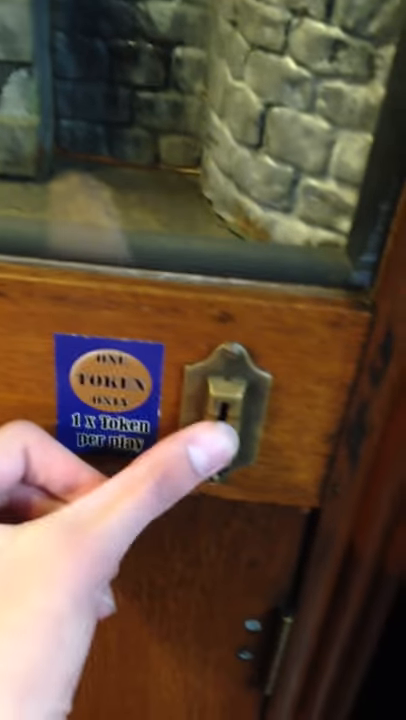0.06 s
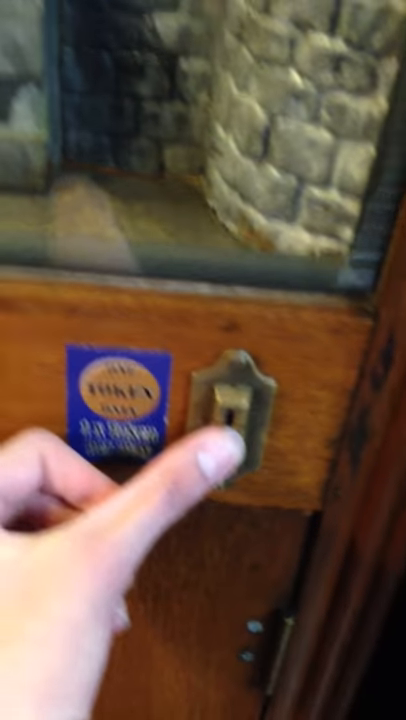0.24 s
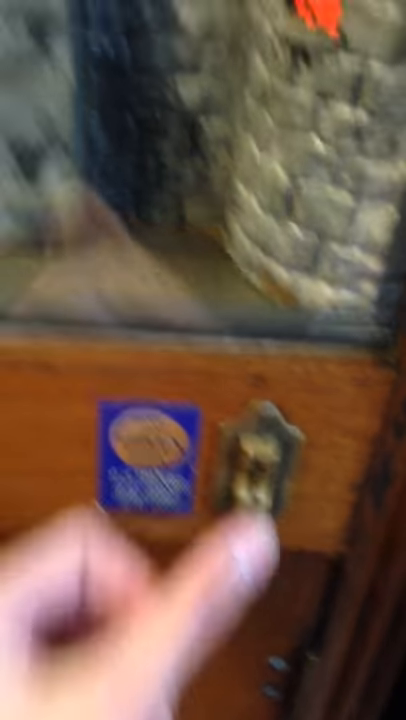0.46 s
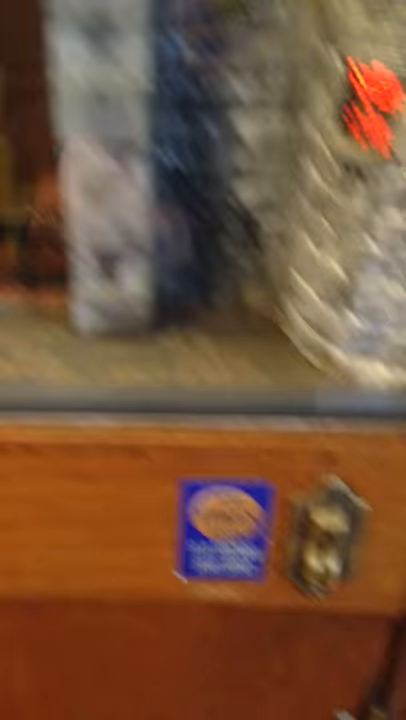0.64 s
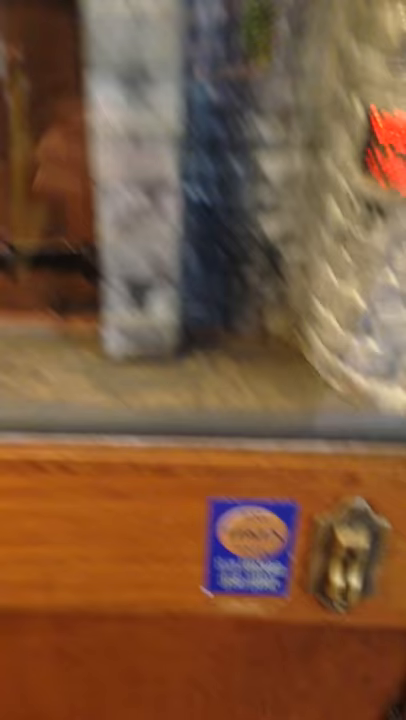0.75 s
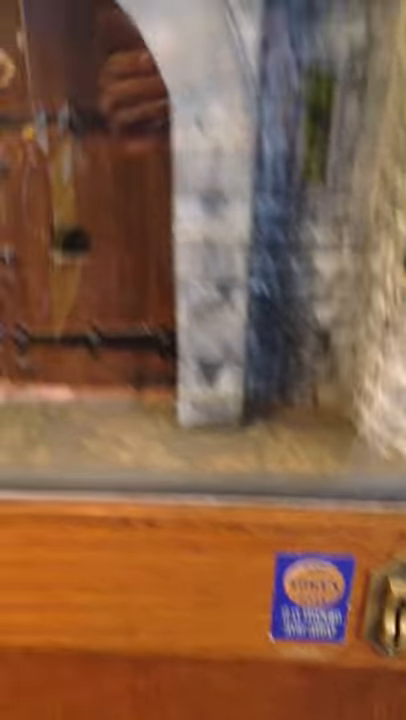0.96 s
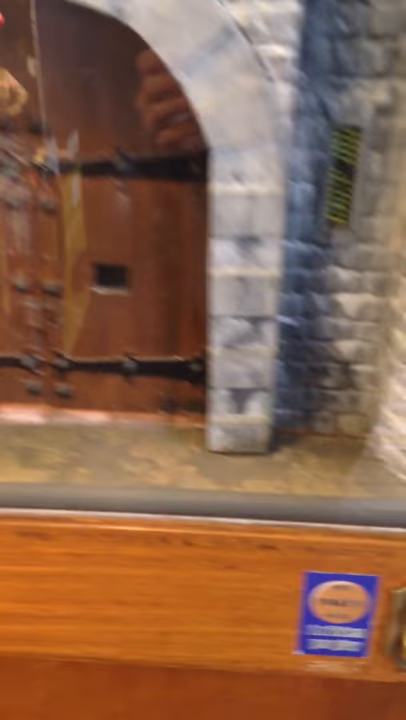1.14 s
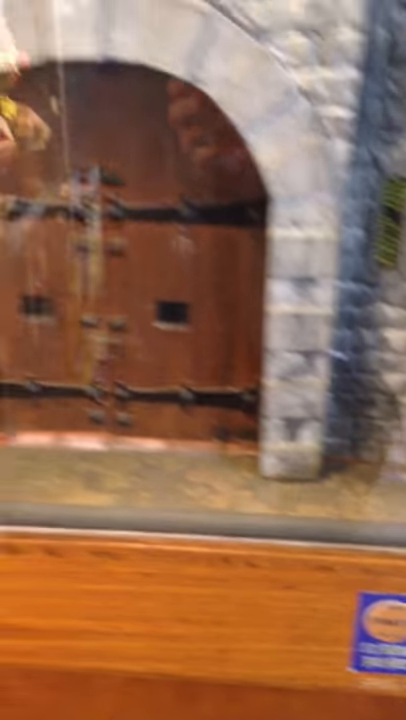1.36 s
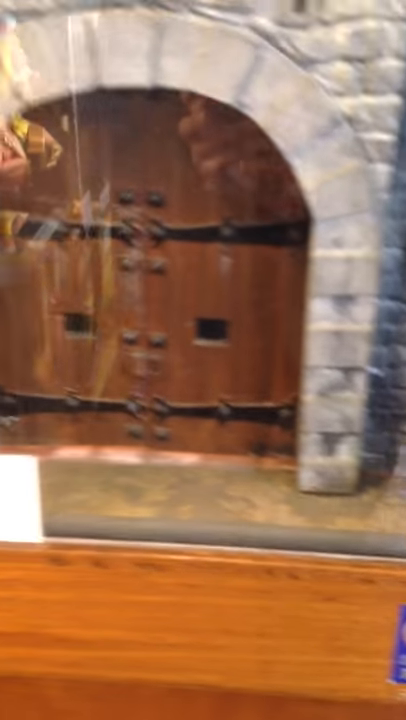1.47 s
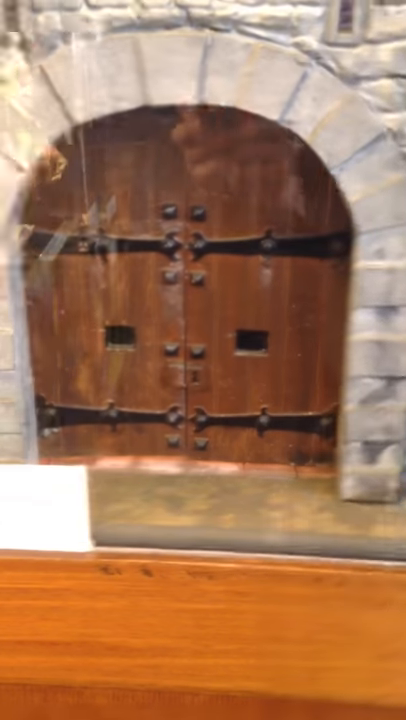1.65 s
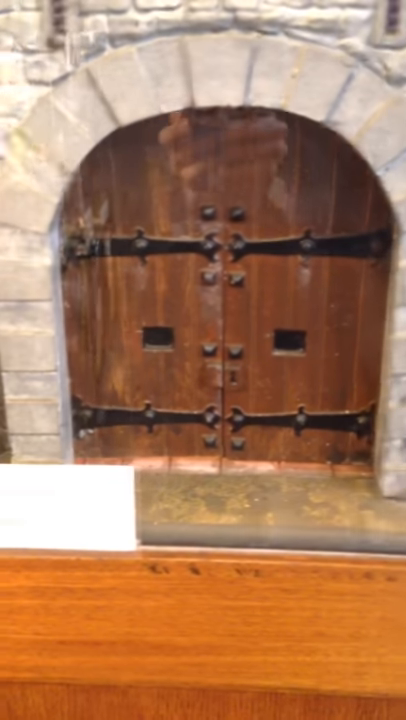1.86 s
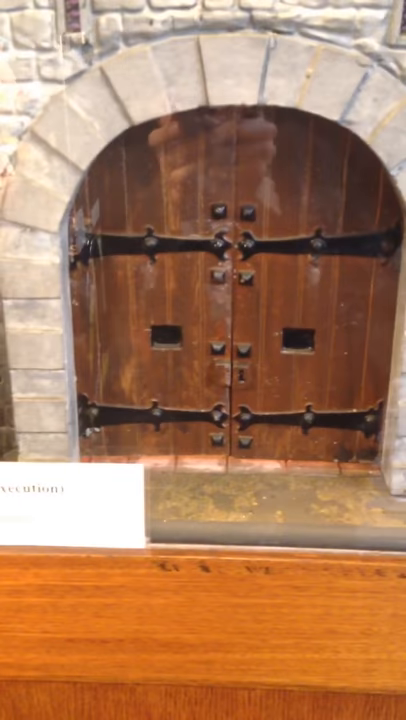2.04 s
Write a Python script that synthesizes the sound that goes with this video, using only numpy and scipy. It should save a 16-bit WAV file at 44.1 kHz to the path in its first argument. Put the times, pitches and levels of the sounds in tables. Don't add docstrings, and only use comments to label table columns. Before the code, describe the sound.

A metal token rattles down a chute and clunks into a wooden box, then a motor hums.

```python
import sys
import numpy as np
from scipy import signal
from scipy.fft import rfft, irfft
from scipy.io import wavfile

SR = 44100
rng = np.random.default_rng(int(sys.argv[2]) if len(sys.argv) > 2 else 0)


def gain_from_db(level_db):
    decades = np.asarray(level_db, float) / 20
    return 10 ** decades


def master(y):
    cut = np.clip(np.atleast_2d(y).T, -1, 1)
    pcm = np.round(cut * 32767)
    wavfile.write(sys.argv[1], SR, pcm.astype(np.int16))


N = 92610
T = np.arange(N) / SR
HIT_T = np.arange(SR // 2) / SR

# hz, density_db_per_hz
FLOOR_SPECTRUM = [(30, -23), (50, -9), (93, -4), (250, -16), (375, -16.5), (520, -13), (913, -16),
                  (14400, -50), (16000, -97)]
# time_s, level_db
THUD_LEVEL = [(0, -37), (.03, -45.5), (.11, -54.5), (.2, -58), (.3, -92)]
# hz, density_db_per_hz
THUD_SPECTRUM = [(35, -33), (60, -16), (135, -1), (526, -11.5), (1450, -13), (2530, -13), (10100, -23),
                 (15000, -39)]
# hz, level_db, t60_s
PANEL_MODES = [(138.2, -2, 0.46), (283, -2.5, 0.14), (460.4, 1, 0.18), (644, 1.5, 0.078)]
# start_s, level_db, struck_spot_hz
BOUNCES = [(.003, -34, 4280), (.0065, -28.5, 7450), (.016, -42, 2200), (0.0545, -44, 2200),
           (.057, -36, 1500), (.073, -35, 3418), (.123, -31, 3418), (0.1306, -31.5, 3418),
           (0.1341, -30.5, 3418), (0.147, -35, 1500), (.162, -41, 7790), (.1645, -29, 3300),
           (0.183, -35, 4400), (0.1961, -23.5, 4350), (.1975, -37, 7790), (0.2, -28, 1300),
           (0.202, -32, 1400), (0.208, -42, 1500), (.218, -44, 11700)]
# hz, level_db, t60_s
CHUTE_MODES = [(3418, 0.5, 0.019), (4280, 1, 0.026), (6000, -16, 0.017), (7790, 1, 0.0095),
               (11700, -23, .02), (15000, 0, 0.012), (1500, -2, 0.025), (2200, -15, 0.022)]
# start_s, dull_db, bright_db, t60_s
SCRAPES = [(.001, -43, -44, 0.029), (.0065, -46, -37.5, 0.046), (0.021, -46, -56, 0.22),
           (0.054, -45, -68, 0.21), (.122, -47, -46, 0.085), (0.13, -43.5, -47, 0.12),
           (.146, -43.5, -56, 0.082), (0.161, -43.5, -40.5, 0.12), (0.179, -40.5, -59, 0.12),
           (0.1956, -33.5, -34, 0.088), (.206, -38, -44.5, 0.087), (0.218, -41, -46, 0.053)]
# hz, density_db_per_hz
DULL_SPECTRUM = [(180, -18), (300, -8.5), (1080, -6), (1930, -7), (4500, -9.5), (5600, -24), (9000, -43),
                 (16000, -52)]
# hz, density_db_per_hz
BRIGHT_SPECTRUM = [(1000, -36), (3000, -19), (5000, -5), (8000, -2.5), (11000, -8), (15200, -6.5),
                   (16000, -33)]
# start_s, length_s, lower_tone_db, upper_tone_db
FLIGHTS = [
    (0, 0.055, -50, -43.5),
    (.006, 0.0045, -41, -57),
    (.013, 0.097, -56, -67),
    (0.094, 0.039, -73, -59),
    (0.12, .008, -46, -61),
    (0.1306, 0.0052, -38.5, -56),
    (0.142, 0.0076, -50, -54),
    (0.173, 0.0099, -36.5, -56),
    (0.2, 0.011, -42, -57),
    (0.27, 0.046, -45.5, -75),
]
# hz, t60_s
TOKEN_TONES = [(9911, .25), (12610, .25)]
# hz, t60_s
ROOM_DECAY = [(150, 0.86), (600, 0.93), (1400, 0.68), (2090, 0.87), (2500, 0.6), (3600, 0.72), (5500, 0.49),
              (12000, 0.29)]
# time_s, level_db
HUM_LEVEL = [(.2, -54), (.225, -45), (.242, -41), (.27, -36), (.3, -47), (.312, -49), (.34, -33.5),
             (.39, -46), (.44, -43), (.52, -44.5), (.82, -45), (1.1, -46), (2.1, -45)]
# multiple, level_db
HUM_OVERTONES = [(1, 0.5), (2, -14), (3, -15), (5, -25), (7, -27.5), (9, -56)]
# time_s, turns_per_s, load_db
SHAFT = [(.25, 26, -6), (.4, 38, -3), (.55, 43.8, -1), (.7, 45.5, 0), (.8, 46.15, 0), (1.0, 47, 0),
         (1.5, 47.35, 0), (2.1, 47.7, 0)]
GEAR_MULTIPLES = [9.85, 12, 13, 14, 15, 16, 26.7, 21.72, 25, 36.8]
# level_db, start_s, stop_s, waver_db
GEAR_TONES = [(-64, 1.54, 2.2, 2), (-56.5, 0.6, 2.2, 0.3), (-61, 0.57, 2.2, 3.5), (-61, 0.93, 1.57, -11),
              (-67.5, 1.4, 2, 2.5), (-63, 0.52, 0.88, 13), (-73, 1.64, 2.6, 0), (-62.5, 1.62, 2.5, 4.5),
              (-71, 1.3, 2.9, 2.5), (-76, 1.8, 3.1, 3)]
# hz, width_hz, level_db
HOUSING = [(700, 63, -5.5), (1110, 170, -8.5), (1750, 150, -21.5)]
# time_s, level_db
WHIRR_LOAD = [(.2, 8), (.9, 1), (1.3, -1), (1.6, 1), (2.1, 2)]
# middle_s, pitch_hz, level_db, length_s
GROANS = [
    (0.226, 176.4, -45.5, 0.054),
    (.45, 700, -58, 0.11),
    (0.457, 400, -59, 0.12),
    (0.584, 644, -57.5, 0.12),
    (0.624, 715.6, -57, 0.065),
    (0.675, 500, -57, 0.28),
]
# start_s, level_db, struck_spot_hz, snap_db
LANDING = [(.2303, -8, 2140, -3.5), (.2318, -21, 5500, 0), (.2325, -14.5, 1110, -1.5),
           (.234, -25, 2500, -4), (.2345, -22, 3470, 4), (0.2349, -30, 5940, 9.5), (0.2382, -14, 1527, 8.5),
           (.2405, -20.5, 600, 6), (.2436, -22, 1970, 9), (.2472, -25, 1300, 0), (.251, -25, 1024, 11),
           (.2565, -16.5, 3320, 1), (.2575, -20.5, 5470, -13), (.259, -18, 1990, 6),
           (.2635, -30.5, 3250, 7), (.2645, -21, 795, -2.5), (.269, -30.5, 1750, 4), (.2755, -19.5, 780, 0),
           (.279, -28, 820, -16), (.293, -29, 435, 10), (.3127, -40, 2060, 15), (.3145, -33.5, 3000, 4),
           (.317, -35, 630, 14), (.3351, -43, 2080, -4)]
BOX_HZ = [158, 330, 500, 640, 754, 801, 997, 1176, 1490, 1842, 2085, 2700, 3350, 4050]
# level_db, t60_s
BOX_MODES = [(-1, 0.12), (-3.5, 0.057), (-7, 0.2), (-1, 0.15), (-0.5, 0.13), (-10.5, 0.22), (-14, 0.14),
             (-2, 0.092), (-10, 0.062), (-9, 0.073), (-2.5, 0.091), (2, 0.049), (-6, 0.032), (-13, 0.077)]
# hz, level_db, t60_s
TRAY_MODES = [(1397, -5, 0.13), (1670, 0, 0.08), (1970, 0, 0.085), (2127, -8.5, .16), (2500, -24, 0.036),
              (3000, -11, 0.063), (3590, -12, 0.11)]
# hz, density_db_per_hz
CRACK_SPECTRUM = [(180, -38), (300, -8.5), (2170, -1), (4370, -14), (6300, -18), (8640, -25.5),
                  (13800, -35.5), (16000, -46)]
# time_s, level_db
SLEEVE_LEVEL = [(.3, -80), (.45, -69.5), (.6, -55), (.72, -54.5), (.9, -61), (1.1, -65), (1.38, -68),
                (1.47, -62.5), (1.6, -68.5), (2.1, -71)]
# hz, density_db_per_hz
CLOTH_SPECTRUM = [(500, 2), (2000, -8), (6000, -9), (12000, -10.5), (16000, -15)]
# start_s, tick_db, thump_db
LATCH = [
    (.776, -30.5, -41.5),
    (2.073, -43, -54),
]
# hz, level_db
TICK_MODES = [(1780, 1), (2380, 0), (3400, 0), (4300, 0), (5470, -4), (6300, -3), (7200, -4), (8300, -15)]
# time_s, pitch_hz, level_db
CAM_WHINE = [(1.0, 725, -87), (1.1, 722, -54), (1.18, 745, -59), (1.27, 775, -66), (1.36, 793, -60),
             (1.48, 790, -60.5), (1.56, 790, -84)]


def evened(x):
    return x / np.sqrt(np.mean(x ** 2) + 1e-20)


def read(points, hz):
    f, value = np.transpose(points)
    return np.interp(np.log(hz + 1), np.log(f + 1), value)


def curve(points, column=1):
    p = np.array(points, float)
    return np.interp(T, p[:, 0], p[:, column])


def add(mix, start_s, sound):
    part = mix[round(start_s * SR):][:len(sound)]
    part += sound[:len(part)]


def cut(x, start_s):
    return x[round(start_s * SR):][:len(HIT_T)]


def rise(rise_s):
    return np.minimum(HIT_T / rise_s, 1)


def decay(t60_s):
    return gain_from_db(-60 * HIT_T / t60_s)


def noise(spectrum):
    white = rfft(rng.standard_normal(N))
    return evened(irfft(white * gain_from_db(read(spectrum, np.fft.rfftfreq(N, 1 / SR))), N))


def drift(hz):
    return evened(signal.lfilter(*signal.butter(2, hz, fs=SR), rng.standard_normal(N)))


def cosine(turns):
    return np.cos(2 * np.pi * turns)


def ring(modes, spread_db, spot_hz=1500, focus_db_per_octave=0):
    out = np.zeros(len(HIT_T))
    for hz, db, t60_s in modes:
        level_luck, pitch_luck = rng.standard_normal(2)
        db = db + spread_db * level_luck - focus_db_per_octave * abs(np.log2(hz / spot_hz))
        out += gain_from_db(db) * decay(t60_s) * np.sin(2 * np.pi * hz * (1 + 0.0019 * pitch_luck) * HIT_T)
    return out / abs(out).max()


def room_floor():
    level_db, swell_db = -54, 0.7
    return gain_from_db(level_db + swell_db * drift(2.6)) * noise(FLOOR_SPECTRUM)


def slot_thud():
    return gain_from_db(curve(THUD_LEVEL) + 0.91 * drift(35)) * noise(THUD_SPECTRUM)


def chute():
    out = np.zeros(N)
    for start_s, db, spot_hz in BOUNCES:
        add(out, start_s, gain_from_db(db) * rise(0.00035) * ring(CHUTE_MODES, 0.74, spot_hz, 24.0))
    dull = noise(DULL_SPECTRUM)
    bright = noise(BRIGHT_SPECTRUM) * gain_from_db(2.3 * drift(280))
    for start_s, dull_db, bright_db, t60_s in SCRAPES:
        hiss = cut(gain_from_db(dull_db) * dull + gain_from_db(bright_db) * bright, start_s)
        add(out, start_s, hiss * (decay(t60_s) + 0.4 * decay(0.005)) * rise(0.00092))
    for start_s, length_s, *levels_db in FLIGHTS:
        free = rise(0.001) * gain_from_db(-1500 * np.maximum(HIT_T - length_s, 0))
        for (hz, t60_s), db in zip(TOKEN_TONES, levels_db):
            level = gain_from_db(db + 1.1 * drift(78)[:len(HIT_T)]) * decay(t60_s)
            add(out, start_s, free * level * np.sin(2 * np.pi * hz * (HIT_T + start_s)))
    return out


def front_panel():
    out = np.zeros(N)
    add(out, 0.004, gain_from_db(-32) * ring(PANEL_MODES, 2.2))
    return out


def room(hits):
    level_db, spacing = -14, 20
    blurred = hits * (0.34 + 0.77 * drift(113))
    taps = np.zeros(SR)
    at = np.arange(300, SR - spacing, spacing)
    taps[at + rng.integers(0, spacing, len(at))] = rng.choice([-1., 1.], len(at))
    hz, t, z = signal.stft(taps, SR, nperseg=256)
    t60_s = np.maximum(read(ROOM_DECAY, hz), 0.05)[:, None]
    tail = signal.istft(z * gain_from_db(-60 * t / t60_s), SR, nperseg=256)[1]
    return gain_from_db(level_db) * signal.fftconvolve(blurred, tail / np.linalg.norm(tail))[:N]


def motor():
    hum_hz, hum_waver_db, whirr_db = 100.3, 1.5, -60
    hum = np.zeros(N)
    for k, db in HUM_OVERTONES:
        waver_db = (k > 1) * hum_waver_db * drift(6.7)
        hum += gain_from_db(db + waver_db) * cosine(k * hum_hz * T + 0.282 * k)
    hum *= gain_from_db(curve(HUM_LEVEL))

    shaft_turns = np.cumsum(curve(SHAFT) * (1 + 0.00072 * drift(2.9))) / SR
    gears = np.zeros(N)
    for k, (db, start_s, stop_s, waver_db) in zip(GEAR_MULTIPLES, GEAR_TONES):
        engaged = np.clip(np.minimum(T - start_s, stop_s - T) / 0.09, 0, 1)
        level = gain_from_db(db + waver_db * np.tanh(drift(14)))
        gears += engaged * level * cosine(k * shaft_turns + rng.random())

    pulsing = rng.standard_normal(N) * (1 + 0.55 * cosine(shaft_turns))
    whirr = np.zeros(N)
    for hz, width_hz, db in HOUSING:
        whirr += gain_from_db(db) * evened(signal.lfilter(*signal.iirpeak(hz, hz / width_hz, SR), pulsing))
    whirr = gain_from_db(whirr_db + curve(WHIRR_LOAD)) * evened(whirr)

    switched_on = np.clip((T - 0.2) / 0.0094, 0, 1)
    load = gain_from_db(curve(SHAFT, column=2))
    return switched_on * (np.sqrt(2) * hum + load * (np.sqrt(2) * gears + whirr))


def groans():
    out = np.zeros(N)
    for middle_s, hz, db, length_s in GROANS:
        swell_db = -20 * ((T - middle_s) / length_s) ** 2
        out += gain_from_db(db + 2.0 * drift(30) + swell_db) * cosine(hz * T)
    return np.sqrt(2) * out


def landing():
    out, hiss = np.zeros(N), noise(CRACK_SPECTRUM)
    modes = [(hz, *mode) for hz, mode in zip(BOX_HZ, BOX_MODES)] + TRAY_MODES
    for start_s, db, spot_hz, snap_db in LANDING:
        crack = cut(hiss, start_s) * gain_from_db(-10) * decay(0.04)
        snap_rise = 1 - np.exp(-HIT_T / 0.00019)
        snap = gain_from_db(snap_db) * decay(0.016) * snap_rise * np.sin(2 * np.pi * spot_hz * HIT_T)
        body = ring(modes, 4.3, spot_hz, 5)
        add(out, start_s, gain_from_db(db) * rise(0.0015) * (body + crack + snap))
    return out


def sleeve():
    return gain_from_db(curve(SLEEVE_LEVEL) + 0.52 * drift(40)) * noise(CLOTH_SPECTRUM)


def latch():
    out = np.zeros(N)
    tick_modes = [(hz, db, 0.008) for hz, db in TICK_MODES]
    for start_s, tick_db, thump_db in LATCH:
        for late_s, db in ((-0.0018, 0.5), (-0.0005, -0.5)):
            add(out, start_s + late_s, gain_from_db(tick_db + db) * rise(0.00017) * ring(tick_modes, 2.5))
        add(out, start_s + 0.00288, gain_from_db(thump_db) * ring([(713, 16, 0.082), (525, -12, 0.2)], 1.7))
        low = ring([(147.5, 0.46, 0.49), (207, 1.4, 0.12)], 2.1)
        add(out, start_s + 0.0235, gain_from_db(thump_db + 1.5) * low)
    return out


def cam_whine():
    level = gain_from_db(curve(CAM_WHINE, column=2) + 2.2 * drift(21))
    return np.sqrt(2) * level * cosine(np.cumsum(curve(CAM_WHINE)) / SR)


def scene():
    hits = chute() + front_panel() + landing() + latch()
    machine = motor() + groans() + cam_whine()
    surroundings = room_floor() + slot_thud() + sleeve()
    return (hits + room(hits) + machine + surroundings)[None]


def band_limit(x):
    return signal.sosfilt(signal.butter(12, 16370, fs=SR, output="sos"), x)


def record(dry):
    low_cut_hz, edge_hz = 45, 15650
    mic = signal.sosfilt(signal.butter(3, low_cut_hz, "high", fs=SR, output="sos"), dry)
    mix = signal.oaconvolve(mic, signal.firwin(511, edge_hz, fs=SR)[None], "same")
    return band_limit(mix)


dry = scene()
out = record(dry)
master(out)
```